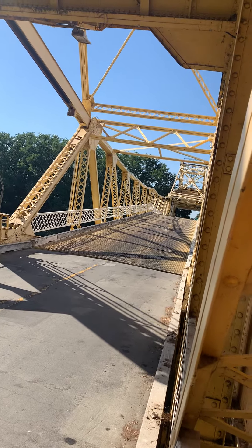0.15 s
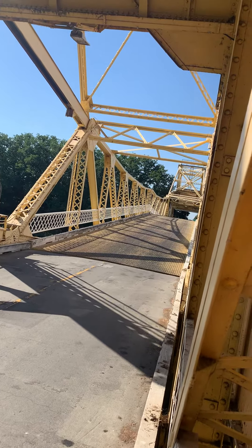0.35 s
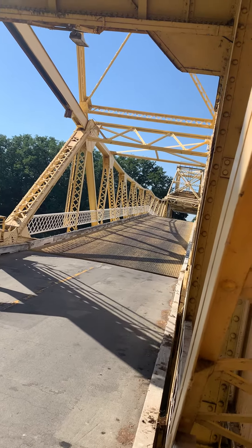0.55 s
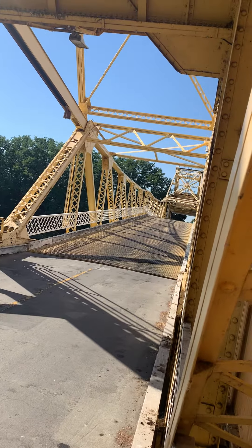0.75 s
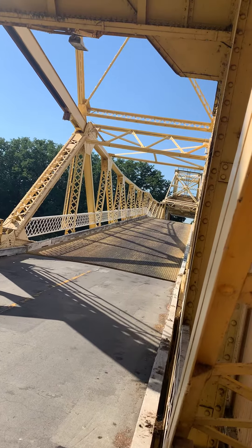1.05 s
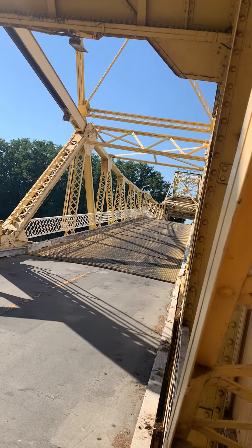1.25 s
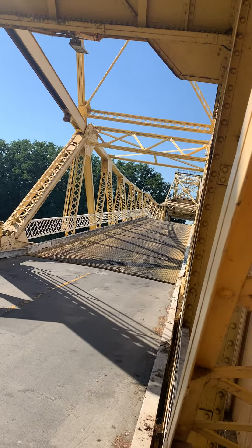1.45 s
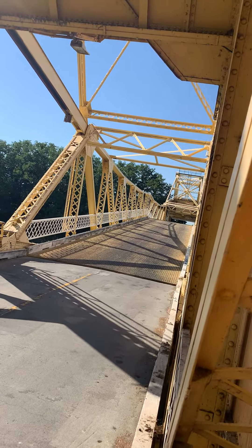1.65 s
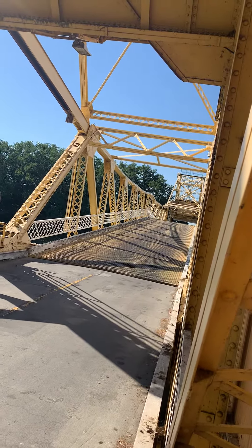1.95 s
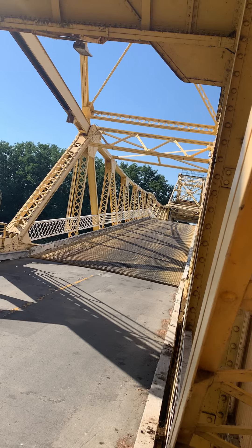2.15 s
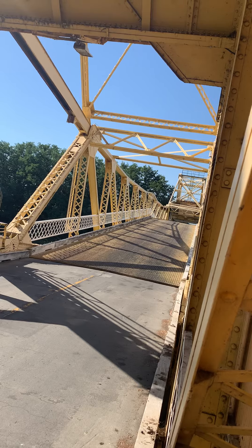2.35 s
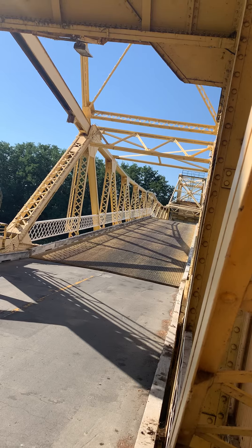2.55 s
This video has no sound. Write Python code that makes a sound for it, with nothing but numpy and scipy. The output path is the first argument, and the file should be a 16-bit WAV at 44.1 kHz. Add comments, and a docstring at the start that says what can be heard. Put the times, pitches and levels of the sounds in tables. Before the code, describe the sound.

A motor drones close by at a steel bridge outdoors. From 0 to 1 s its low hum flutters, dips and climbs about two semitones, with short groans from the steelwork; then it holds loud, nearly pure and steady until 2.7 s. Underneath are a weak throb, swelling low booms, mains buzz, a barely audible thin whine, rumble, soft air and distant traffic, and faint close rustles.

```python
"""First a motor close by, beside a steel bridge: its drone climbs for a second, then holds loud and nearly pure.
Sines following one speed make the drone, its octave and its throb; the steelwork booms, rings and groans around it
as a wandering sine, filtered noise and short notes. Behind stand a mains buzz and a thin whine, made of steady sines.
Coloured noise gives the rush of air and distant traffic, and a few faint rustles close to the microphone."""
import sys
import numpy as np
from scipy import signal
from scipy.fft import rfft, irfft, next_fast_len
from scipy.io import wavfile

SR = 44100
rng = np.random.default_rng(int(sys.argv[2]) if len(sys.argv) > 2 else 0)


def transcribe(u):
    """Save the signal u as a 16-bit wav file named by the first command-line argument.

    u: samples, shape (n,) or (channels, n), limited to [-1, 1]; the rate is SR.
    q: integer samples, one column per channel.
    """
    v = np.clip(np.atleast_2d(u).T, -1, 1)
    q = np.round(v * 32767).astype(np.int16)
    wavfile.write(sys.argv[1], SR, q)


N = 118629
T = np.arange(N) / SR  # s
FFT_SIZE = next_fast_len(N, True)
HZ = np.maximum(np.arange(FFT_SIZE // 2 + 1) * SR / FFT_SIZE, 1)  # frequency of each bin
PORT_SIGN = np.array([[1], [-1]])  # left port, right port

# Pitch of the motor's tone. Each row: time [s], pitch [Hz].
MOTOR_PITCH = [(0, 219.5), (.08, 223.9), (.27, 225.1), (.42, 229.3), (.6, 236.4), (.8, 240.7), (.95, 245.9),
               (1.1, 247.5), (1.4, 246.3), (1.7, 248.1), (2.15, 247.1), (2.42, 244.9), (2.69, 247)]
# Level of that tone ahead of its flutter. Each row: time [s], level [dB].
MOTOR_LEVEL = [(0, -19), (.06, -23.5), (.1, -20), (.16, -17), (.22, -15.5), (.3, -19), (.37, -24.5),
               (.44, -20.5), (.5, -22), (.54, -24), (.57, -16), (.77, -11.5), (.82, -17.5), (.855, -26),
               (.9, -17.5), (.97, -10), (1.45, -10), (1.67, -11.5), (1.92, -9.5), (2.38, -11.5),
               (2.58, -11), (2.65, -9.5)]
# Level of the tone's octave. Each row: time [s], level [dB].
OCTAVE_LEVEL = [(0, -43), (.17, -36.5), (.215, -26.5), (.27, -37.5), (.38, -44.5), (.5, -30.5), (.6, -44.5),
                (.7, -45), (.755, -33), (.81, -47.5), (1.2, -43.5), (2.69, -41)]
# Level of the shaft's throb. Each row: time [s], level [dB].
THROB_LEVEL = [(0, -26), (.11, -39), (.2, -32.5), (.37, -25), (.65, -28.5), (1.0, -30), (1.1, -40.5),
               (1.33, -28), (1.48, -35), (2.3, -33.5), (2.69, -37.5)]
# Flutter of the tone during the run-up. Each row: time [s], depth [0-1].
FLUTTER = [(0, 0.4), (.53, 0.6), (.62, 0.15), (1.0, 0)]
# Swells of the steelwork's low boom. Each row: time [s], level [dB].
BOOM_LEVEL = [(0, -39.5), (.58, -42), (.68, -27.5), (.76, -38), (.86, -27), (.98, -26), (1.16, -36.5),
              (1.27, -27.5), (1.42, -30.5), (1.52, -21), (1.64, -35.5), (1.85, -31), (1.95, -43),
              (2.05, -23), (2.17, -42), (2.34, -41.5), (2.41, -26.5), (2.48, -38.5), (2.57, -21),
              (2.69, -33)]
# Other resonances of the steelwork. Each row: centre [Hz], half-width at -6 dB [Hz], level before swells [dB].
STEEL_RESONANCES = [(77.7, 10, -34.5), (199, 27, -36.5), (286.3, 12, -37), (331.3, 14, -36.5),
                    (356.2, 7.6, -37.5), (416, 5, -42.5), (463, 34, -50), (558.7, 9, -46), (657, 3.5, -51),
                    (750, 39, -42.5), (872, 4.7, -53), (1650, 81, -59), (1894, 69, -55.5),
                    (2505, 45, -55.5), (3220, 74, -62), (4770, 450, -77), (5650, 100, -67)]
# Extra stir of steelwork and rumble while the motor speeds up. Each row: time [s], change of level [dB].
EFFORT = [(0, 2.5), (.25, 2.5), (.4, 3), (.8, 1.5), (1.15, -1), (2.69, -1)]
# Brief groans of the steelwork. Each row: middle [s], mean pitch [Hz], peak level [dB], spread in time [s].
GROANS = [(0.136, 335, -26.5, 0.039), (0.148, 679, -38.5, 0.067), (0.292, 278, -36.5, 0.049),
          (0.408, 337.7, -23, 0.038), (.52, 328, -26.5, 0.02), (0.611, 360.2, -30, 0.058),
          (0.681, 347.3, -27.5, 0.02), (.71, 559, -38, 0.034), (0.798, 561, -33, 0.028),
          (0.983, 334, -28, 0.034), (0.988, 378, -34, 0.045), (1.507, 336.2, -27.5, 0.043),
          (2.038, 334.7, -28.5, 0.052), (2.037, 416, -33, .04), (2.585, 380.7, -30, 0.031),
          (2.597, 329, -33.5, 0.049)]
# Mains buzz. Each row: multiple of the mains frequency, level at the start, in the middle and at the end [dB],
# left minus right [dB], left leads by [radians].
BUZZ_LINES = [(10, -39, -43, -38.5, 6, -0.85), (12, -48.5, -45.5, -47.5, -5.5, -1),
              (13, -48, -47.5, -56.5, 5, 2.5), (14, -43, -40, -40.5, -4, -0.5),
              (16, -49.5, -42.5, -37.5, -4, 0.65), (18, -42.5, -46, -59, -2.5, -1.5),
              (19, -53, -57.5, -59.5, 1.5, -1.5), (20, -41.5, -39, -43, -6, -0.7),
              (21, -47, -52.5, -57.5, -2.5, -1.5), (22, -42, -41, -41.5, -3.5, -1.4),
              (23, -54.5, -55, -59, -5.5, -0.5), (24, -47.5, -51.5, -49, -1, 1.5),
              (26, -47, -55.5, -41, -6.5, 2.5), (28, -51, -54.5, -56.5, 2.5, 4),
              (30, -40.5, -56.5, -48, -1.5, -0.1), (32, -61.5, -50.5, -48, -1.5, -0.4),
              (34, -54, -53, -52, -6, 0.5), (35, -54, -58.5, -60.5, -1, 0.5),
              (36, -57.5, -57.5, -58.5, -8, 0.4), (44, -66, -60.5, -60, 3.5, -2.5)]
# Thin electrical whine. Each row: pitch [Hz], level once up to speed [dB].
WHINE_LINES = [(10800, -80.5), (11280, -80.5)]
# Close rustles. Each row: middle [s], level before the grain [dB], spread in time [s].
RUSTLES = [(0.021, -43, 0.011), (0.091, -46, 0.02), (0.158, -52.5, 0.013), (0.353, -54.5, 0.064),
           (0.987, -54, 0.012), (1.071, -56.5, 0.032), (1.556, -56.5, 0.031), (2.06, -50.5, 0.008),
           (2.604, -53.5, 0.033)]
# Colour of the rustles. Each row: frequency [Hz], relative density [dB per Hz].
RUSTLE_COLOUR = [(2000, -19), (4000, -2.5), (6000, 2.5), (7500, -4.5), (9000, -15.5), (11000, -16.5),
                 (15000, -21)]
# Colour of the low rumble. Each row: frequency [Hz], relative density [dB per Hz].
RUMBLE_COLOUR = [(15, -38), (30, -31), (37, -21), (45, -4), (70, -3.5), (110, 2.5), (160, -3), (200, -0.5),
                 (300, -1.5), (400, -7.5), (480, -13), (700, -26.5), (1200, -65.5)]
# Colour of the airy rush before its echoes. Each row: frequency [Hz], relative density [dB per Hz].
RUSH_COLOUR = [(200, -9), (450, -5.5), (600, 1.5), (800, -1.5), (1050, -3.5), (1400, -4.5), (1900, -4.5),
               (2300, -9), (2900, -16), (3500, -17.5), (4500, -24), (5600, -24), (6500, -29.5),
               (7200, -33.5), (7900, -43), (9500, -46), (11000, -53.5), (15000, -62)]
# Echoes of the rush off the girders. Each row: delay [ms], level in the bass [dB].
GIRDER_ECHOES = [(6.3, -17), (9.7, -18.5), (16.7, -16), (27.5, -17)]
# Likeness of noise at the two microphone ports. Each row: frequency [Hz], correlation [-1 to 1].
PORT_LIKENESS = [(100, .9997), (300, .98), (480, .87), (650, .55), (900, .65), (1300, .65), (1600, .35),
                 (2000, .45), (2500, .15), (3300, .55), (4100, .85), (4700, .98), (5500, .82), (7000, .92),
                 (12000, .7)]
# Balance of the ports before it is evened out in the bass. Each row: frequency [Hz], left minus right [dB].
PORT_BALANCE = [(600, 0.5), (1000, -2), (1700, -2.5), (2800, 0), (8000, -0.5)]
# Phase between the ports. Each row: frequency [Hz], left leads by [radians].
PORT_LEAD = [(100, 0), (250, -.2), (450, -.1), (650, -.7), (850, -.25), (1200, -.85), (1400, -.6),
             (1600, 1.2), (2050, .45), (2600, 3), (3250, 1.1), (3900, 1.9), (4400, 2.9), (4800, 3.15),
             (5200, 3.5), (6400, 6), (7400, 6.5), (8400, 9)]

WAVER_DB, WAVER_HZ = 0.23, 1.9
FLUTTER_HZ, RUN_UP_JITTER_HZ = 13.75, 4.3  # jitter: spread of the pitch at full flutter
THROB_RATIO = .2275  # throb pitch over tone pitch
BOOM_HZ, BOOM_WANDER_HZ = 133, 3.3
STEEL_SWELL_DB, STEEL_FOLLOWS_BOOM, STEEL_BOOM_REACH_HZ = 1.36, .25, 453
GROAN_WANDER_HZ = 3
MAINS_HZ, HUM_DB = 60, -34.5
BUZZ_WAVER_DB, BUZZ_WAVER_HZ, BUZZ_PHASE_WANDER = 2, 4.5, 0.42  # phase in radians
BUZZ_SCATTER, BUZZ_SCATTER_HZ = 0.15, 23  # spread of the gain, rate
WHINE_ONSET_S, WHINE_FADE_DB = 1, 14.5
RUSTLE_GRAIN_DB, RUSTLE_GRAIN_HZ = 2.5, 61
RUMBLE_DB, RUSH_DB = -27, -32.5
RUMBLE_PATCHY_DB, RUSH_PATCHY_DB = 1.3, 2.7  # flicker in the bass
RUSH_SMOOTH_ABOVE_HZ, ECHO_CUT_HZ = 6500, 1100
CUTOFF_HZ = 15300


def motor():
    """The nearby motor: a fluttering main tone, its octave and a low throb all follow one speed."""
    flutter_depth = in_time(FLUTTER)
    hz = in_time(MOTOR_PITCH) + RUN_UP_JITTER_HZ * flutter_depth * drift(25)
    flutter = 1 + np.clip(flutter_depth, 0, 1) * np.cos(2 * np.pi * FLUTTER_HZ * T)
    main_gain = flutter * from_db(in_time(MOTOR_LEVEL) + WAVER_DB * drift(WAVER_HZ))
    main = main_gain * tone(hz, -.1 * PORT_SIGN)  # reaches the right port slightly first
    octave_gain = from_db(in_time(OCTAVE_LEVEL) + 1.8 * drift(9.8))
    octave = octave_gain * tone(2 * hz, 0.63 * drift(2.5))
    throb_gain = from_db(in_time(THROB_LEVEL) + 1.2 * drift(2.5))
    throb = throb_gain * tone(THROB_RATIO * hz, 0.8 * drift(5.2))
    return main + octave + throb


def steelwork():
    """One swelling boom, and narrow resonances shaken at random; the low ones swell with the boom and the effort."""
    boom_db = in_time(BOOM_LEVEL)
    boom = from_db(boom_db) * tone(BOOM_HZ + BOOM_WANDER_HZ * drift(8))
    stir_db = in_time(EFFORT) + STEEL_FOLLOWS_BOOM * (boom_db - boom_db.mean())
    shaking, rings = port_spectra(), 0
    for hz, width_hz, db in STEEL_RESONANCES:
        ring = rms_one(sound_of(shaking / (1 + 1j * (HZ - hz) / width_hz) ** 2))
        share = 1 / (1 + (hz / STEEL_BOOM_REACH_HZ) ** 4)  # high resonances hardly follow the boom
        level_db = db + share * stir_db + STEEL_SWELL_DB * drift(7.7)
        rings = rings + from_db(level_db) * ring
    return boom + rings


def groans():
    """Single notes of the steelwork swell and die away, slightly unsteady in pitch."""
    return sum(swell(s, db, length) * tone(hz + GROAN_WANDER_HZ * drift(10)) for s, hz, db, length in GROANS)


def mains_buzz():
    """Multiples of the mains frequency over a steady hum; moving air on the way roughens every line but the hum."""
    out = from_db(HUM_DB) * tone(4 * MAINS_HZ)  # beats gently against the motor's tone
    for multiple, *levels_db, pan_db, lead in BUZZ_LINES:
        wander = BUZZ_PHASE_WANDER * drift(3.8)
        phase = rng.uniform(0, 2 * np.pi) + wander + PORT_SIGN * lead / 2
        level_db = np.interp(T, [0, T[-1] / 2, T[-1]], levels_db)
        level_db = level_db + BUZZ_WAVER_DB * drift(BUZZ_WAVER_HZ)
        roughness = 1 + BUZZ_SCATTER * drift(BUZZ_SCATTER_HZ)
        pan = from_db(PORT_SIGN * pan_db / 2)
        out = out + from_db(level_db) * roughness * pan * tone(multiple * MAINS_HZ, phase)
    return out


def whine():
    """A thin electrical whine of steady pitches emerges as the motor gets up to speed."""
    fade_db = WHINE_FADE_DB * np.minimum(T / WHINE_ONSET_S - 1, 0)
    return sum(from_db(db + fade_db + 2 * drift(6)) * tone(hz) for hz, db in WHINE_LINES)


def rustles():
    """Close to the microphone: short, grainy brushes of bright noise."""
    grain = rms_one(from_db(RUSTLE_GRAIN_DB * drift(RUSTLE_GRAIN_HZ)))
    bright = rms_one(sound_of(port_spectra() * from_db(at_hz(RUSTLE_COLOUR))))
    return sum(swell(*row) for row in RUSTLES) * grain * bright


def air():
    """The background: a low rumble that stirs with the motor, and the even rush of air and distant traffic."""
    rumble = from_db(RUMBLE_DB + in_time(EFFORT)) * outdoor_noise(RUMBLE_COLOUR, RUMBLE_PATCHY_DB)
    rush = from_db(RUSH_DB) * outdoor_noise(RUSH_COLOUR, RUSH_PATCHY_DB, GIRDER_ECHOES, count=48)
    return rumble + rush


def outdoor_noise(colour, patchy_db, echoes=(), count=12):
    """Coloured stereo noise, with dull echoes, whose bands flicker on their own, less so in the treble; rms 1."""
    echo_sum = sum(from_db(db) * np.exp(-2j * np.pi * HZ * ms / 1000) for ms, db in echoes)
    paths = 1 + echo_sum / (1 + (HZ / ECHO_CUT_HZ) ** 2)  # direct sound plus echoes: a rippled spectrum
    spectra = port_spectra() * from_db(at_hz(colour)) * paths
    tops = np.geomspace(60, 9000, count)  # band edges in Hz; the last band runs on to the top
    band = np.digitize(HZ, tops[:-1])
    depth_db = patchy_db / (1 + (tops / RUSH_SMOOTH_ABOVE_HZ) ** 2)
    out = 0
    for k in range(count):
        out = out + sound_of(spectra * (band == k)) * from_db(depth_db[k] * drift(9))
    return rms_one(out)


def port_spectra():
    """White noise as the two microphone ports pick it up, one spectrum each; the bass is equally loud in both."""
    mid, side = rfft(rng.standard_normal((2, FFT_SIZE)))
    alike = np.clip(at_hz(PORT_LIKENESS), -1, 1)
    both = np.sqrt(1 + alike) * mid + PORT_SIGN * np.sqrt(1 - alike) * side
    shaded = np.minimum(HZ / 600, 1) ** 2  # evens out the balance below 600 Hz
    balance = from_db(PORT_SIGN * shaded * at_hz(PORT_BALANCE) / 2)
    return both * balance * np.exp(1j * PORT_SIGN * at_hz(PORT_LEAD) / 2)


def tone(hz, lead=0):
    """A sine of rms 1 that follows a pitch curve, its phase ahead by lead radians."""
    return np.sqrt(2) * np.sin(2 * np.pi * np.cumsum(hz + 0 * T) / SR + lead)


def swell(s, db, length):
    """A bell-shaped rise and fall of the gain around time s."""
    return from_db(db) * np.exp(-.5 * np.minimum(abs(T - s) / length, 10) ** 2)


def drift(rate):
    """Slow chance with spread 1: noise through two equal low-pass poles at rate Hz."""
    pole = np.exp(-200 * np.pi * abs(rate) / SR)  # one step per 100 samples
    noise = rng.standard_normal(N // 100 + 1002)
    slow = signal.lfilter([1], [1, -2 * pole, pole * pole], noise)[1000:]  # skip the settling
    return np.interp(np.arange(N) / 100, np.arange(len(slow)), rms_one(slow - slow.mean()))


def in_time(rows):
    """A control curve at every sample."""
    return np.interp(T, *np.transpose(rows))


def at_hz(points):
    """A table over log frequency, read at every bin."""
    hz, value = np.transpose(points)
    return np.interp(np.log(HZ), np.log(hz), value)


def sound_of(spectrum):
    """From a spectrum back to samples."""
    return irfft(spectrum, FFT_SIZE)[..., :N]


def from_db(db):
    """Decibels to gain."""
    return 10 ** (np.asarray(db) / 20)


def rms_one(x):
    """Scale to rms 1."""
    return x / np.sqrt(np.mean(x ** 2) + 1e-20)


def scene():
    """Everything that sounds at the bridge."""
    return motor() + steelwork() + groans() + mains_buzz() + whine() + rustles() + air()


def record(dry):
    """A steep low-pass cuts the top, 70 dB down from the cutoff on."""
    return signal.sosfilt(signal.cheby2(12, 70, CUTOFF_HZ, fs=SR, output="sos"), dry)


dry = scene()
out = record(dry)
transcribe(out)
```